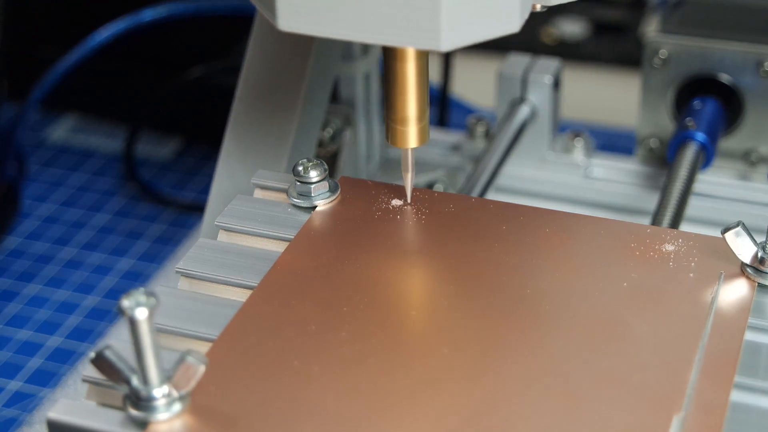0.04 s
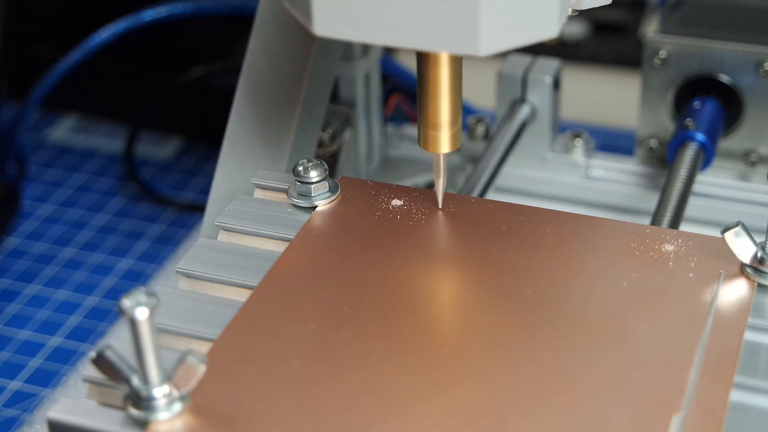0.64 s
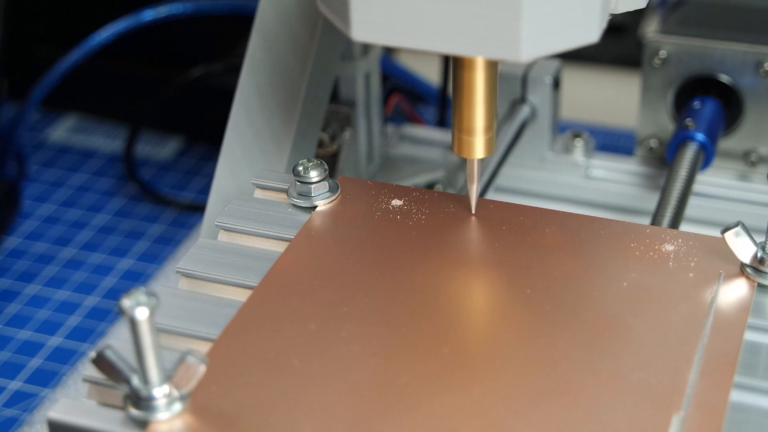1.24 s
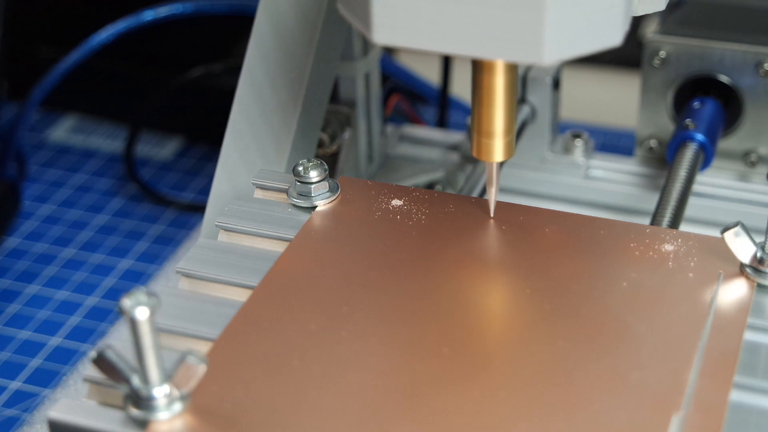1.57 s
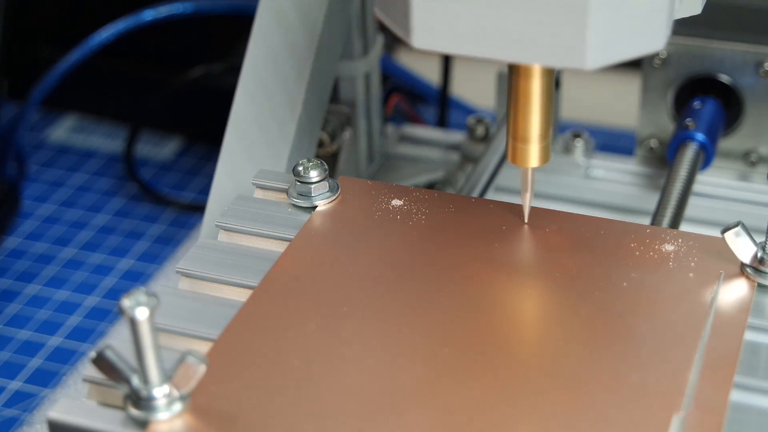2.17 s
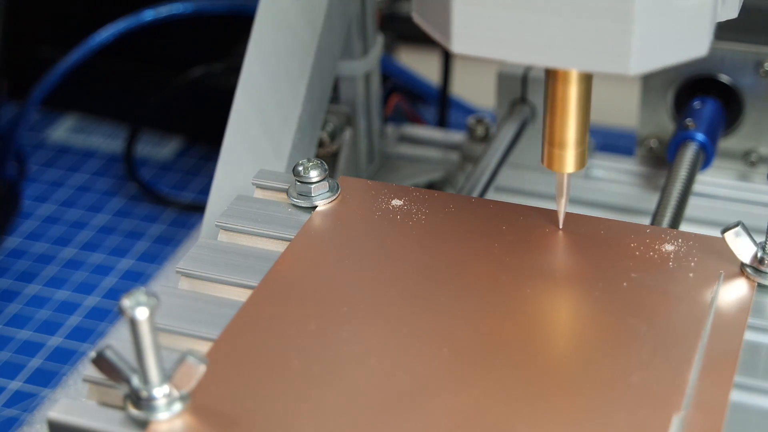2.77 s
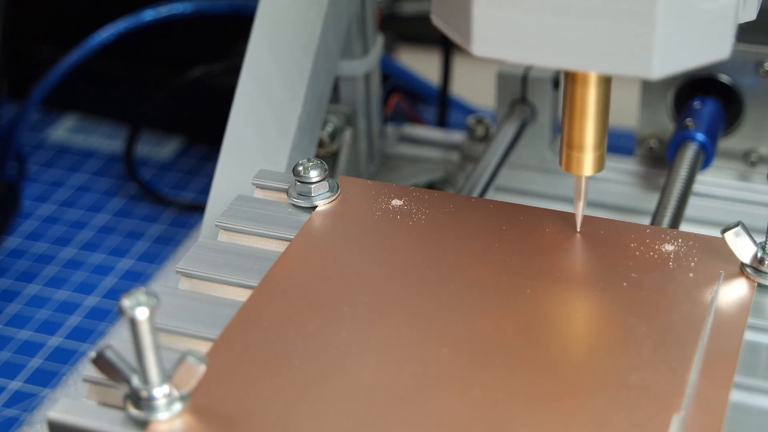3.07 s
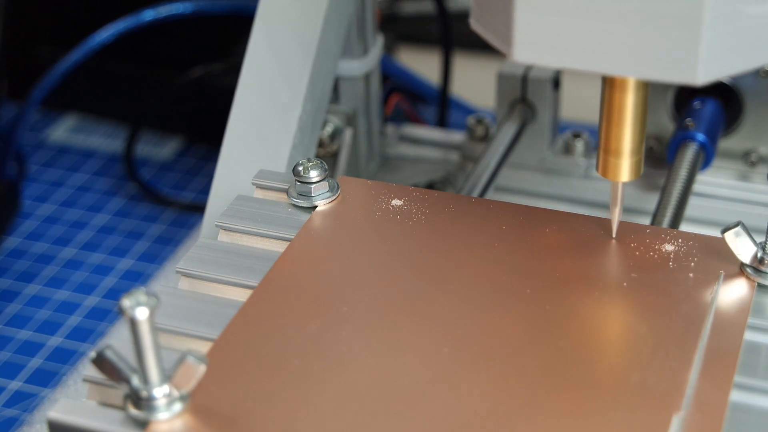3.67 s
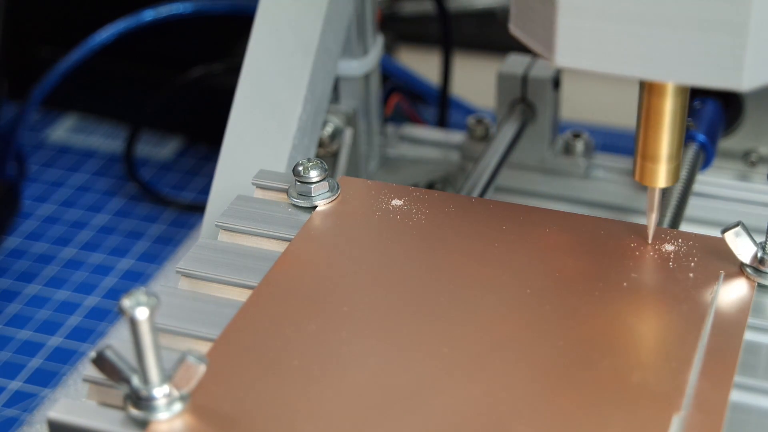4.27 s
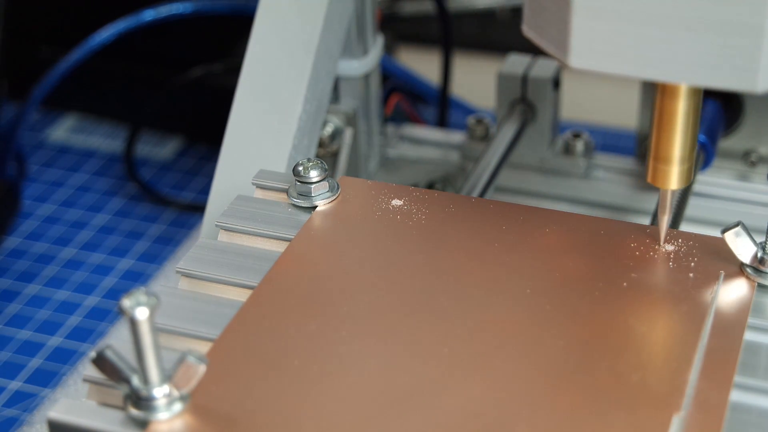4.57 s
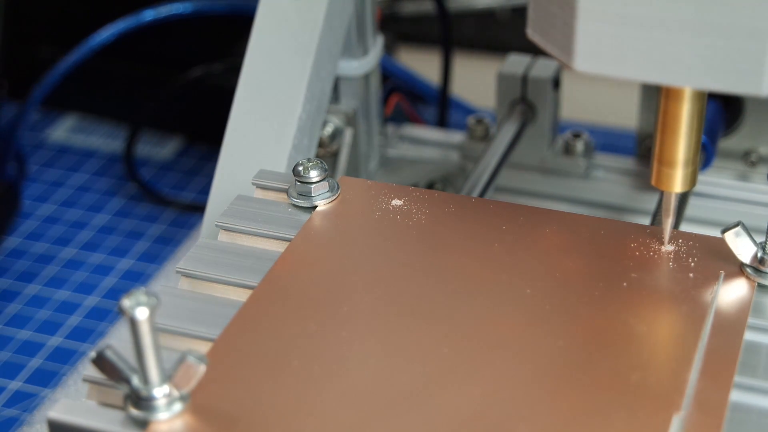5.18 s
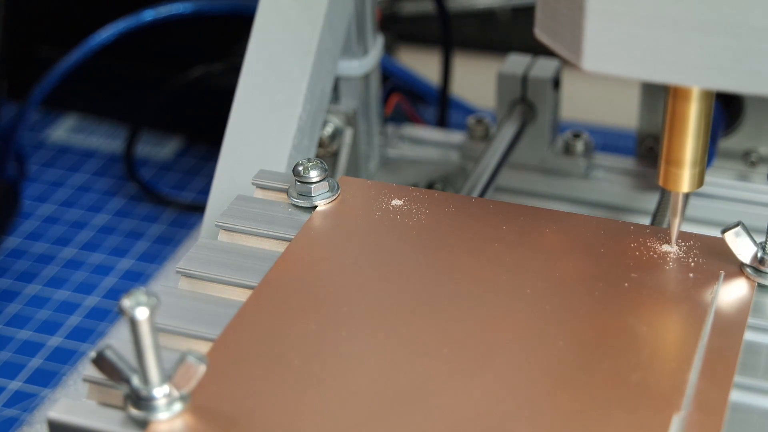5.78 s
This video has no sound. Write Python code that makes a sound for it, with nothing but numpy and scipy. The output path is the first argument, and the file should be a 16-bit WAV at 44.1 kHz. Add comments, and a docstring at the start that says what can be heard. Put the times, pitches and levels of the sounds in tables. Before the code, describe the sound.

A small milling machine spindle hums and whines steadily over an airy hiss, then buzzes and squeals as its bit bites into copper.

```python
"""Desktop mill cutting a copper-clad board

The spindle turns about 254 times a second: its unbalanced shaft hums, the five-slot armature whines,
and brushes and cooling air hiss through the frame's resonances over a faint stepper motor.
The colour shifts as the carriage travels from left to right. At the far edge the bit grazes,
then bites deeper: the speed sags slightly, the motor buzzes and the copper squeals."""
import sys
import numpy as np
from scipy import signal
from scipy.fft import rfft, irfft
from scipy.io import wavfile
from scipy.ndimage import uniform_filter1d

SR = 44100
rng = np.random.default_rng(int(sys.argv[2]) if len(sys.argv) > 2 else 0)


def dump(signal):
    """Clip the signal to [-1, 1] and save it as 16-bit WAV at the path in sys.argv[1]."""
    limited = np.clip(np.atleast_2d(signal).T, -1, 1)
    pcm = np.round(limited * 32767).astype(np.int16)
    wavfile.write(sys.argv[1], SR, pcm)


N = 256662
T = np.arange(N) / SR
FREE_HZ = 254.6  # spindle speed with no load
PASS_S = 4.6  # the carriage crosses at an even pace, then rests at the far edge

# Cutting load, from 0 (skimming) to 1 (biting): time_s, load
CUTTING_LOAD = [(0, 0), (3.8, 0.068), (4.75, 0.2), (5.13, 0.0056), (5.25, 0.79), (5.7, 1), (5.82, 0.98)]
# Shaft hum and armature whine; near and far are the two edges of the board: shaft_order, near_db,
# far_db, shift_at_share, shift_width_share, mid_pass_boost_db, bite_db, pan_db, near_lead_rad,
# far_lead_rad. Shares are of the pass; positive pan and phase lead favour the left channel.
SPINDLE_TONES = [(1, -54, -52.5, 0.75, .15, 2, -40.5, 2.5, 0.048, -0.05),
                 (2, -60.5, -58, 0.45, .03, -5.5, -52, 3.5, 0.28, -0.27),
                 (3, -54.5, -52, .55, 0.035, 1, -49.5, 1, 0.063, -0.16),
                 (5, -48, -40.5, .5, .12, 1, -55, 6, 1, 0.062),
                 (10, -52.5, -42.5, 0.53, 0.078, 1, -44.5, 2, 0.61, 0.48),
                 (15, -42.5, -39.5, 0.69, 0.015, -2, -39, 0.8, -0.87, -0.67),
                 (20, -49, -49.5, .9, .06, -4, -46, -2, -0.015, -.4)]
# Commutator overtones that stand out: shaft_order, near_db, far_db, bite_db, pan_db, lead_rad
COMMUTATOR_TONES = [(4, -74, -63, -55, 1, -0.06), (6, -70, -59, -45, 9, -.2),
                    (7, -53.5, -47, -43.5, -0.5, 0.2), (25, -49, -55.5, -60, 3, -0.31),
                    (30, -56, -47, -44, 5, -1.4), (34, -54, -53.5, -53, 3, -1.3),
                    (35, -59, -48, -51, 4, 1.5), (41, -53, -49, -47, 3, -1.3), (43, -62, -64, -59, 6, -.4),
                    (50, -56, -57, -58, 0, -.3), (53, -54, -52, -53, -1, -1.1)]
# Stereo balance of the hiss and faint harmonics, left over right: frequency_hz, pan_db
STEREO_PAN = [(60, 1), (92, -1), (140, 1.0), (210, 14), (330, 0.5), (500, 1.5), (770, -1), (1170, 1.5),
              (1790, -0.5), (2740, 0.5), (4190, 1.5), (6410, 2.5), (9810, 2.0), (15000, 0.5)]
# Their base phase lead, left ahead of right: frequency_hz, lead_rad
STEREO_LEAD = [(60, -0.43), (1300, -0.2), (2000, 0.061), (3100, -0.69), (3550, 1), (3900, -0.96),
               (5000, -0.29), (6000, -0.91), (8200, -0.7), (10500, -1), (11600, -0.92), (12300, -1.4),
               (14700, -0.95)]


def gain_of(db):
    """Decibels to amplitude."""
    return 10 ** (np.asarray(db) / 20)


def curve_at(points, hz):
    """A spectral curve, joined by straight lines on a log-frequency axis."""
    corners_hz, values = np.transpose(points)
    return np.interp(np.log(hz + 1), np.log(corners_hz + 1), values)


def follow(rows, t):
    """Each column of an automation table at the times t."""
    times, *columns = np.transpose(rows)
    return [np.interp(t, times, column) for column in columns]


def wander(rate_hz, size=4096):
    """Random modulation of rms 1, with motion up to about rate_hz."""
    hz = np.fft.rfftfreq(size, T[-1] / size)
    drift = irfft(rfft(rng.standard_normal(size)) / np.sqrt(1 + (hz / rate_hz) ** 4))
    return np.interp(T, np.linspace(0, T[-1], size), (drift - drift.mean()) / drift.std())


def patches(shape, frames, bins):
    """A smooth random field of rms 1 over time and frequency."""
    field = uniform_filter1d(rng.standard_normal(shape), frames, axis=0)
    field = uniform_filter1d(field, bins, axis=1)
    return field / field.std()


def swell(middle_s, length_s):
    """A smooth rise to 1 and back."""
    return np.exp(-2 * ((T - middle_s) / length_s) ** 2)


def crossfade(t, at=0.43, width=0.084):
    """Fade from the near sound (0) toward the far sound (1), halfway at the share `at` of the pass."""
    return .5 + .5 * np.tanh((np.minimum(t / PASS_S, 1) - at) / (2 * width))


def blend(near_db, far_db, bite_db, travel, load):
    """A tone's amplitude, set by the carriage's place and taken over by the cut."""
    return (1 - load) * gain_of(near_db + travel * (far_db - near_db)) + load * gain_of(bite_db)


def tone(cycles, rms_db, pan_db, lead_rad):
    """A stereo sine, placed by level and phase."""
    sides = np.array([[.5], [-.5]])
    pan = gain_of(sides * pan_db)
    pan = pan / np.sqrt(np.mean(pan ** 2))
    return np.sqrt(2) * gain_of(rms_db) * pan * np.cos(2 * np.pi * cycles + sides * lead_rad)


def shaft_turns(load, sag_hz=0.5, drift_hz=0.0852, flutter_hz=0.12):
    """Turns of the spindle so far; its speed sags under load, drifts and flutters a little."""
    return np.cumsum(FREE_HZ - sag_hz * load + drift_hz * wander(1) + flutter_hz * wander(11)) / SR


def spindle(turns, load, fade_hz=4, wobble_hz=6.8, wobble_db=0.7, chatter_hz=35):
    """The unbalanced shaft hums and the armature slots whine; biting shakes their level and phase."""
    # The bit catches in the copper and one tone swells: middle_s, length_s, shaft_order, level_db
    catches = [(4.06, 0.067, 2, -49), (4.364, 0.067, 2, -48), (4.803, 0.2, 2, -43), (5.272, 0.076, 3, -40),
               (5.358, 0.043, 5, -39), (5.378, .1, 2, -44), (5.445, .08, 10, -41), (5.5, 0.21, 3, -39),
               (5.69, 0.32, 2, -40.5), (5.71, 0.12, 5, -37)]
    shake = 0.088 + 0.058 * load
    mid_pass = swell(2.1, 1.55)
    lull_db = -6 * swell(5.08, 0.22)  # the low tones ease off just before the bite
    out = 0
    for order, near_db, far_db, at, width, mid_db, bite_db, pan_db, near_rad, far_rad in SPINDLE_TONES:
        travel = crossfade(T, at, width)
        ride_db = mid_db * mid_pass + lull_db * (order * FREE_HZ < 2000)
        level = blend(near_db, far_db, bite_db, travel, load) * gain_of(ride_db)
        for middle_s, length_s, caught_order, catch_db in catches:
            if round(caught_order) == round(order):
                level = np.hypot(level, gain_of(catch_db) * swell(middle_s, length_s))
        fade_db = (1.5 - 0.85 * travel) * wander(fade_hz)  # steadier toward the far edge
        wobble = np.sin(2 * np.pi * (wobble_hz * T + rng.random()))
        cycles = round(order) * turns + rng.random() + shake * wander(chatter_hz) / (2 * np.pi)
        lead_rad = near_rad + travel * (far_rad - near_rad) + 0.17 * wander(fade_hz)
        chatter = 1 + shake * wander(chatter_hz)
        out = out + level * chatter * tone(cycles, fade_db + wobble_db * wobble, pan_db, lead_rad)
    return out


def commutator(turns, travel, load, trim_db=-1.5, fade_db=0.6, fade_hz=1.8, swing_rad=0.28):
    """High shaft orders fade and swing as the motor moves through its own reflections."""
    out = 0
    for order, near_db, far_db, bite_db, pan_db, lead_rad in COMMUTATOR_TONES:
        level = blend(near_db, far_db, bite_db, travel, load)
        cycles = round(order) * turns + rng.random()
        db = trim_db + fade_db * wander(fade_hz)
        out = out + level * tone(cycles, db, pan_db, lead_rad + swing_rad * wander(fade_hz))
    return out


def faint_harmonics(turns, fade_db=4.5, fade_hz=1.2, swing_rad=0.83):
    """The other high shaft orders come and go in the hiss, each from its own shifting direction."""
    # Level of each harmonic: pitch_hz, level_db
    levels = [(2500, -67), (5000, -70), (7500, -76), (10000, -66), (12000, -66), (14000, -61), (15000, -56)]
    strong_orders = [round(row[0]) for row in SPINDLE_TONES + COMMUTATOR_TONES]
    out = 0
    for order in range(11, 59):
        if order not in strong_orders:
            hz = order * FREE_HZ
            db = curve_at(levels, hz) + fade_db * wander(fade_hz)
            lead_rad = curve_at(STEREO_LEAD, hz) + swing_rad * wander(fade_hz)
            out = out + tone(order * turns + rng.random(), db, curve_at(STEREO_PAN, hz), lead_rad)
    return out


def stereo_air(hz, travel, treble):
    """Left and right noise spectra; short waves reach each side with their own level and phase ripple."""
    # How alike the two sides are, from 0 to 1: frequency_hz, coherence
    likeness = [(60, 0.65), (120, 1), (250, 1), (1200, 0.92), (1500, 0.86), (2000, 0.98), (3000, 0.92),
                (3600, 1), (4900, 0.7), (5700, 0.76), (7300, 0.47), (8600, 0.68), (11000, 0.66),
                (13300, 0.69)]
    shape = (len(travel), len(hz))
    half_pan_db = curve_at(STEREO_PAN, hz) / 2 + 1.96 * treble * patches(shape, 150, 12)
    lead_rad = curve_at(STEREO_LEAD, hz) * (0.6 + 0.67 * travel)  # widens as the carriage travels
    lead_rad = lead_rad + 0.14 * treble * patches(shape, 150, 12)
    left, independent = rng.standard_normal((2, *shape)) + 1j * rng.standard_normal((2, *shape))
    coherence = np.clip(curve_at(likeness, hz), 0, 1)
    right = (coherence * left + np.sqrt(1 - coherence ** 2) * independent) * np.exp(-1j * lead_rad)
    return np.array([left * gain_of(half_pan_db), right * gain_of(-half_pan_db)])


def brushes_and_air(turns, split_hz=4000, dull_hz=11000, flutter_below_hz=1000, size=2048):
    """Brush and air noise coloured by the frame, whose resonances shift in strength along the travel."""
    # Base spectrum of the hiss: frequency_hz, density_db
    hiss_spectrum = [(20, -99), (60, -89), (130, -99), (200, -109), (400, -90), (650, -78), (1500, -74.5),
                     (2500, -71.5), (4000, -74.5), (5500, -73), (7300, -77.5), (10000, -75.5),
                     (13300, -74.5), (15000, -78)]
    # Scraping of the bit at full load: frequency_hz, boost_db
    scrape_eq = [(100, -3), (300, -12), (600, -2.5), (1200, 2.5), (1700, -0.5), (2700, 1.2), (5000, 0.5),
                 (9000, 1.5), (14000, 0.5)]
    # Rumble of the carriage on its rails: time_s, boost_db
    rail_rumble = [(0, 6), (1.4, -2), (3, 4), (4.3, 4), (4.7, -5), (5.3, 2), (5.82, -3)]
    # Resonances of frame, board and motor can: centre_hz, half_width_hz, near_boost_db, far_boost_db
    resonances = [(68, 11, -2, 7), (160.4, 14.4, 17.5, 17.5), (251, 26, 24.5, 26), (379, 24, 18.5, 17.5),
                  (524, 19, 9, 11.5), (706, 63, 3.5, 3), (1130, 75, 3, 3.5), (1279, 16.5, 5.5, 7.5),
                  (1380, 44, -2.5, -2), (1620, 34, 4, 1), (1750, 60, 0, 3), (2180, 103, 4, 5),
                  (2704, 103, 6.5, 8), (2936, 22, 3, 9), (3440, 120, 5.5, 2), (3820, 41, 5, 2),
                  (4450, 330, 1.1, 3), (5920, 90, 6, 4.5), (8680, 190, 2.8, 4), (11300, 580, 2.5, 1.8),
                  (13130, 720, 3.5, 4.5)]
    hop = size // 4
    t = np.arange(N // hop + 5)[:, None] * hop / SR
    hz = np.fft.rfftfreq(size, 1 / SR)
    travel, load = crossfade(t), follow(CUTTING_LOAD, t)[0]
    treble = hz ** 2 / (hz ** 2 + split_hz ** 2)
    rattle_db = -1.47 + 0.2 * travel
    top_end = hz ** 4 / (hz ** 4 + dull_hz ** 4)
    brush_db = -0.35 - (1.5 + 2.5 * top_end) * crossfade(t, at=1)  # softer and duller at the far edge
    db = curve_at(hiss_spectrum, hz) + load * curve_at(scrape_eq, hz)
    db += (1 - treble) * rattle_db + treble * brush_db
    db += follow(rail_rumble, t)[0] * np.exp(-(hz / 130) ** 2)
    for centre_hz, width_hz, near_db, far_db in resonances:
        db += (near_db + travel * (far_db - near_db)) * np.exp(-.5 * ((hz - centre_hz) / width_hz) ** 2)
    db += 3.3 * patches(db.shape, 6, 5) / (1 + (hz / flutter_below_hz) ** 2)  # the low rattle flutters
    db += 0.7 * patches(db.shape, 14, 60)  # broad bands flicker
    db += patches(db.shape, 150, 2)  # drifting reflections comb the hiss finely
    spectra = stereo_air(hz, travel, treble) * gain_of(db) * np.sqrt(1.5 * SR / size)
    _, hiss = signal.istft(spectra, nperseg=size, noverlap=size - hop, time_axis=1, freq_axis=2)
    pulsing = 1 + .01 * np.cos(2 * np.pi * turns) + .02 * np.cos(4 * np.pi * turns)
    return pulsing * hiss[:, :N]


def stepper(travel, load, trim_db=-.5, duck_db=2, waver_db=1.5, jitter_cycles=.12):
    """The lead screw's motor sings at its step rate, wavering with drag and ducking under load."""
    # Steady tones of the stepper drive: pitch_hz, near_db, far_db
    drive_tones = [(666.5, -64, -63), (1332, -63, -62), (1998, -57, -53), (6645, -63, -64),
                   (6739, -61, -63), (6772, -63, -63)]
    out = 0
    for hz, near_db, far_db in drive_tones:
        db = trim_db + near_db + travel * (far_db - near_db) - duck_db * load + waver_db * wander(4.3)
        out = out + tone(hz * T + jitter_cycles * wander(11), db, pan_db=1, lead_rad=-0.34)
    return out


def copper_squeal(turns, load, width_hz=300, decay_turns=.3, scrape_mix=.5):
    """Once a turn the cutting edge strikes and scrapes, ringing a resonance that glides with the grip."""
    # Path of the squeal: time_s, centre_hz, full_load_db
    glide = [(5.3, 1100, -68), (5.335, 1320, -43), (5.365, 1750, -38), (5.4, 2170, -39), (5.44, 2530, -49),
             (5.52, 2400, -57), (5.58, 1550, -41), (5.68, 1388, -38), (5.82, 1620, -38)]
    centre_hz, db = follow(glide, T)
    strikes = sum(np.cos(2 * np.pi * order * turns) for order in range(2, 14))
    scrapes = np.exp(-(turns % 1) / decay_turns) * rng.standard_normal(N)
    drive = strikes / strikes.std() + scrape_mix * scrapes / scrapes.std()
    # a gliding band-pass: shift down by the centre frequency, low-pass, shift back up
    carrier = np.exp(2j * np.pi * np.cumsum(centre_hz) / SR)
    pole = np.exp(-2 * np.pi * width_hz / SR)
    ring = (carrier * signal.lfilter([1], np.poly([pole] * 3), drive / carrier)).real
    return gain_of(db) * load * ring / ring.std()


def scene():
    """The layers follow the shaft, the carriage and the cutting load."""
    travel = crossfade(T)
    load = np.clip(follow(CUTTING_LOAD, T)[0], 0, 1)
    turns = shaft_turns(load)
    motor = spindle(turns, load) + commutator(turns, travel, load) + faint_harmonics(turns)
    return motor + brushes_and_air(turns) + stepper(travel, load) + copper_squeal(turns, load)


def record(dry):
    """A steep high cut at 15 kHz."""
    high_cut = signal.firwin(1023, 15000, window=("kaiser", 9), fs=SR)
    return signal.oaconvolve(dry, high_cut[None], "same")


dry = scene()
out = record(dry)
dump(out)
```